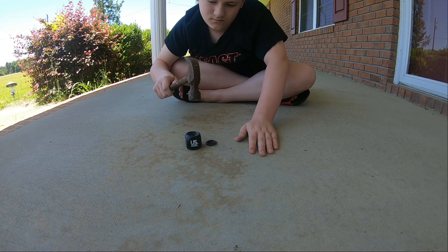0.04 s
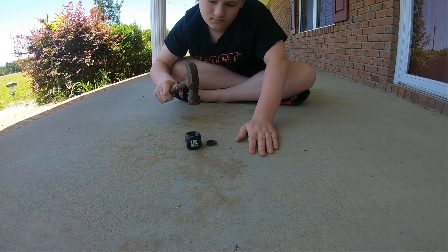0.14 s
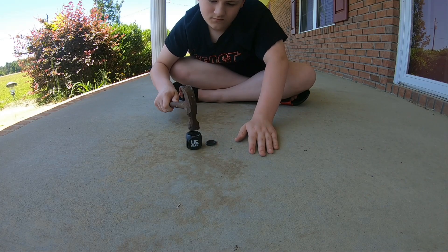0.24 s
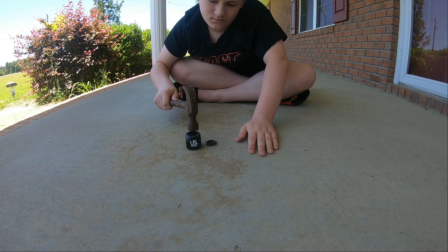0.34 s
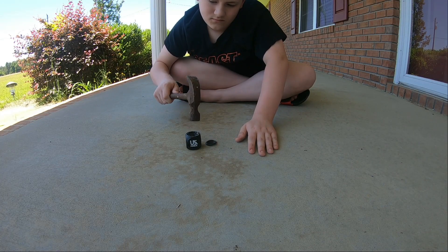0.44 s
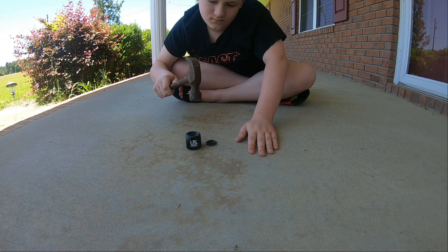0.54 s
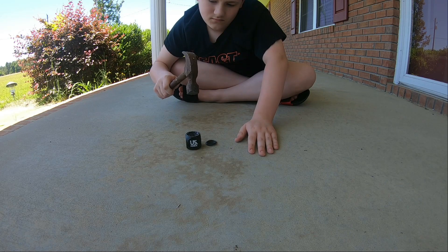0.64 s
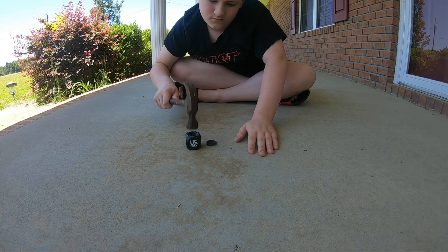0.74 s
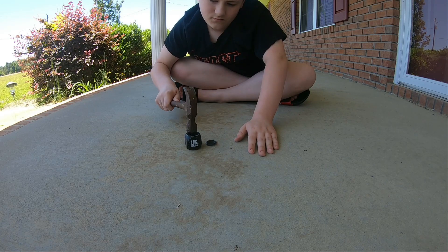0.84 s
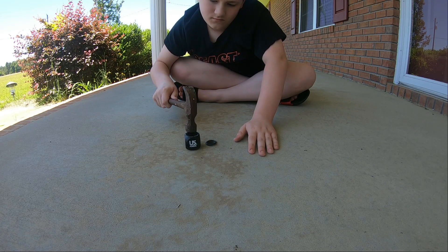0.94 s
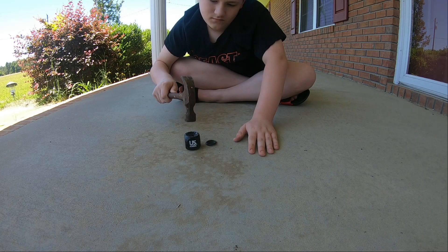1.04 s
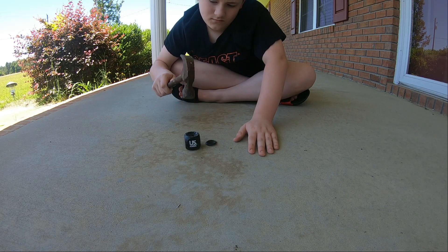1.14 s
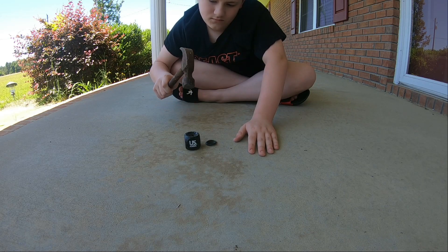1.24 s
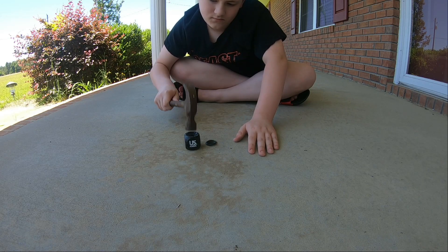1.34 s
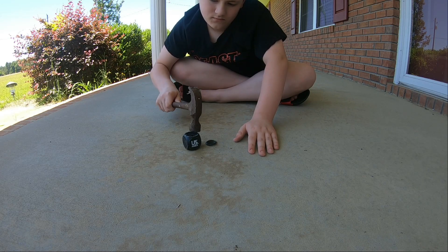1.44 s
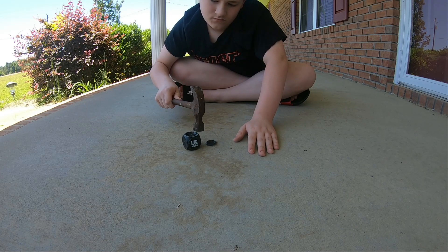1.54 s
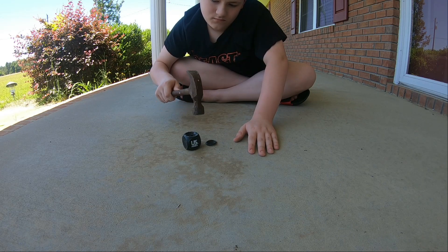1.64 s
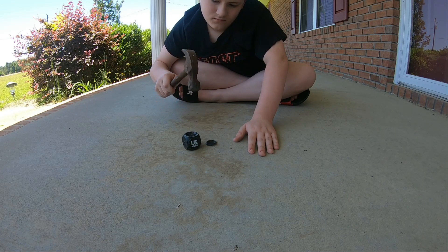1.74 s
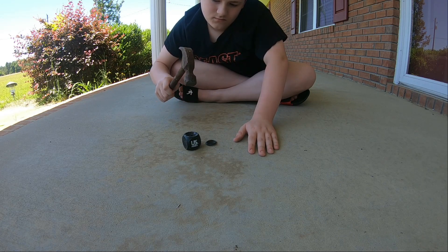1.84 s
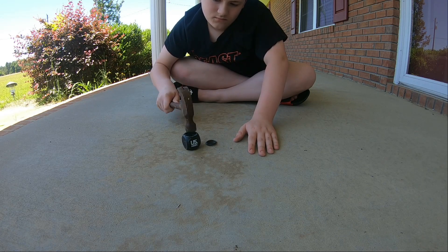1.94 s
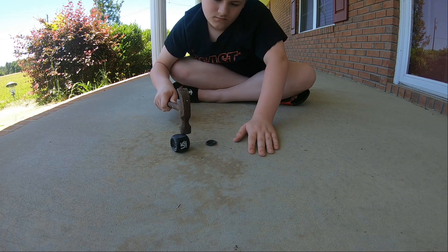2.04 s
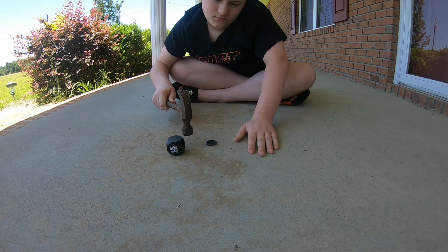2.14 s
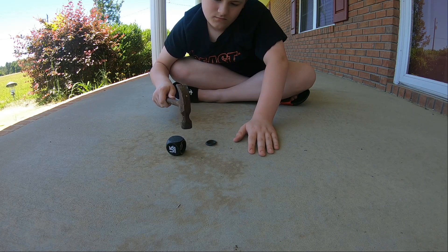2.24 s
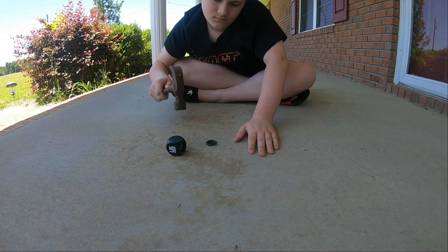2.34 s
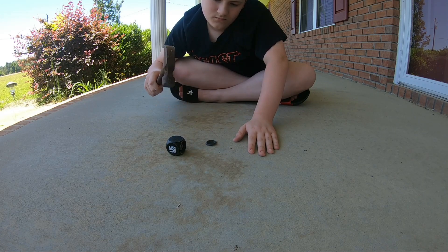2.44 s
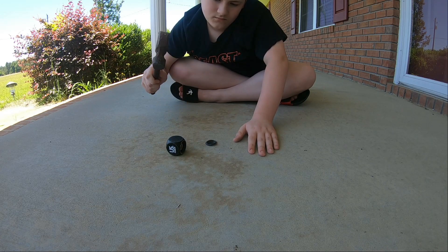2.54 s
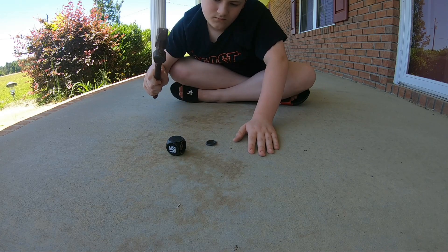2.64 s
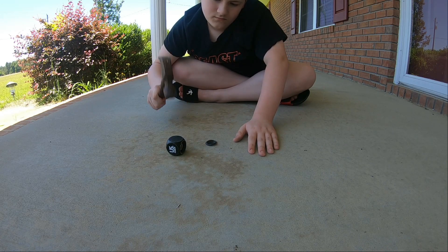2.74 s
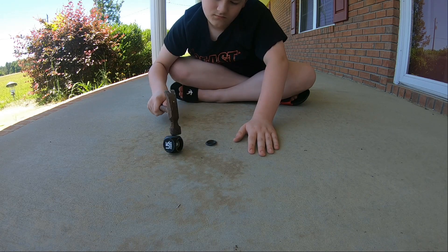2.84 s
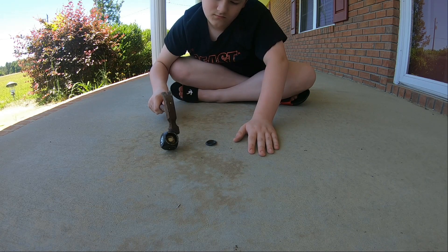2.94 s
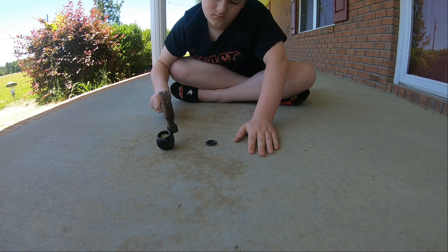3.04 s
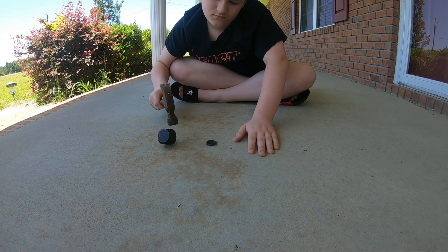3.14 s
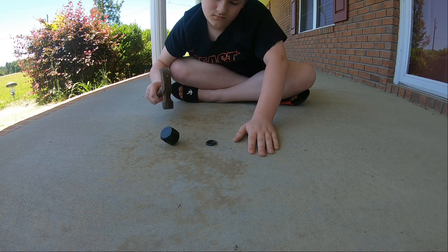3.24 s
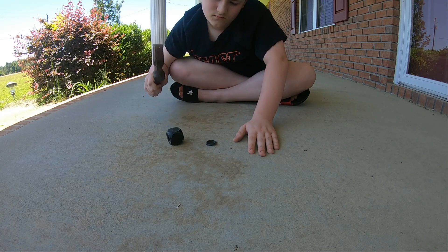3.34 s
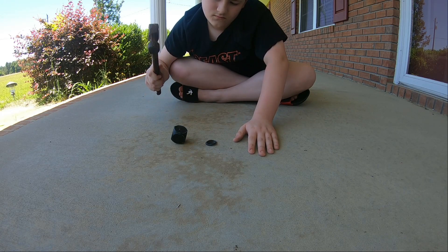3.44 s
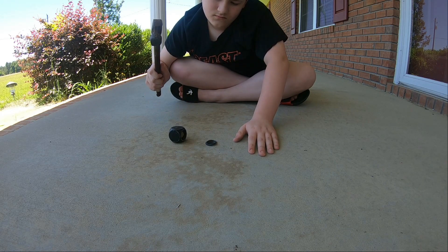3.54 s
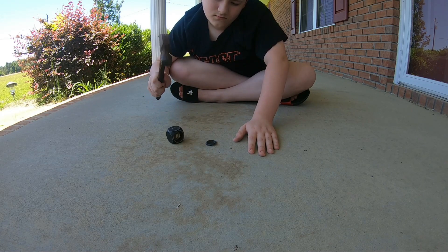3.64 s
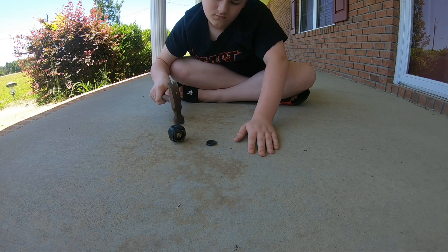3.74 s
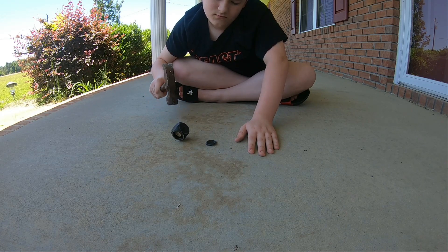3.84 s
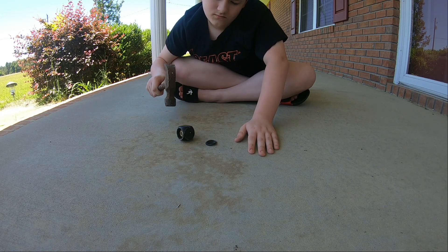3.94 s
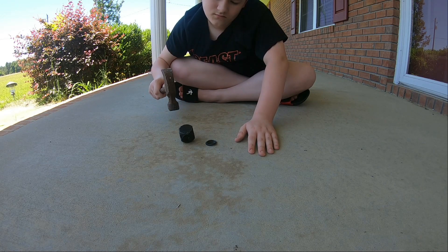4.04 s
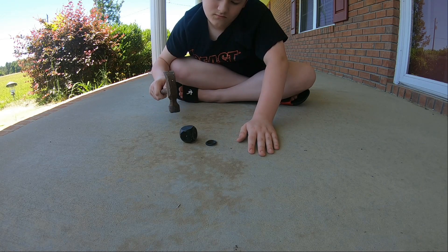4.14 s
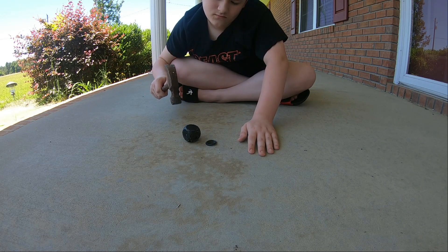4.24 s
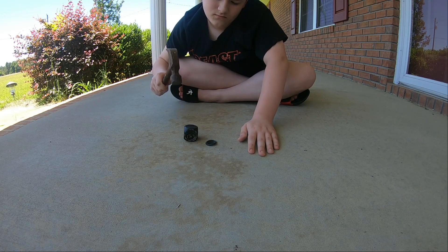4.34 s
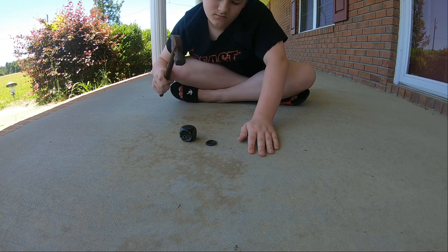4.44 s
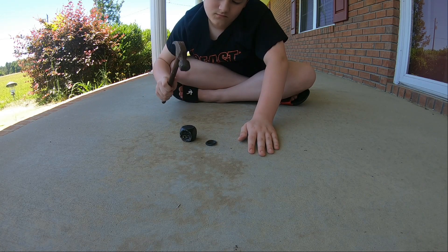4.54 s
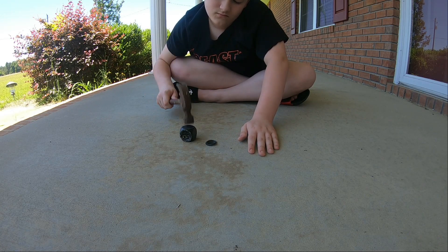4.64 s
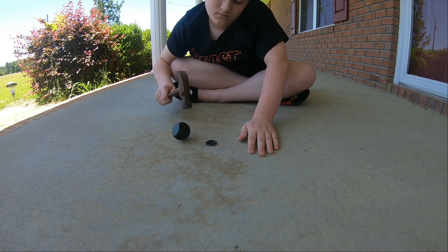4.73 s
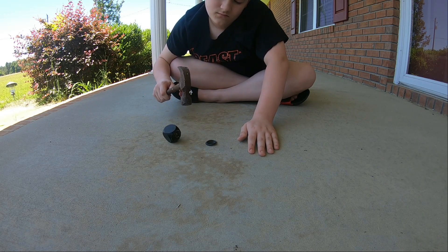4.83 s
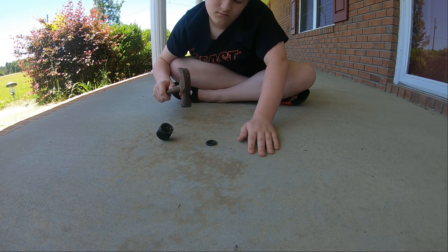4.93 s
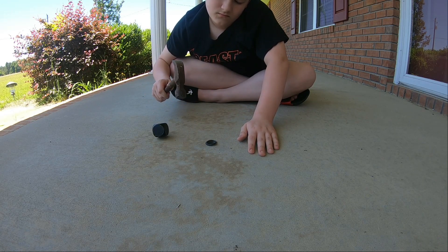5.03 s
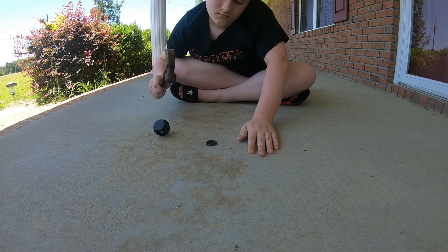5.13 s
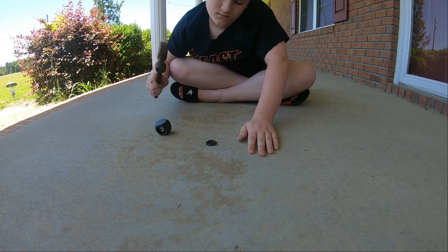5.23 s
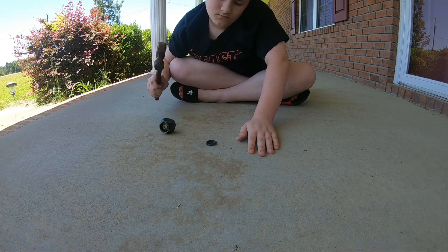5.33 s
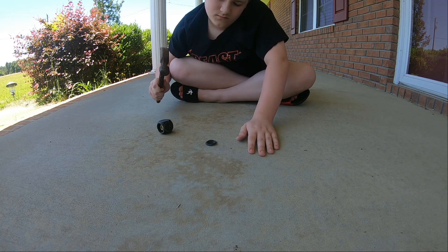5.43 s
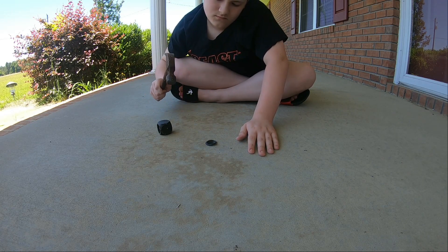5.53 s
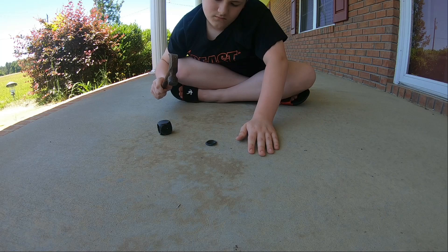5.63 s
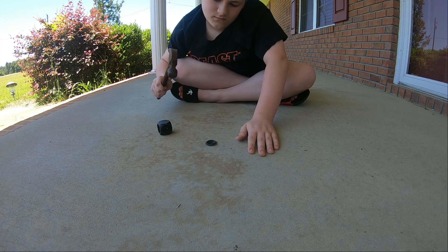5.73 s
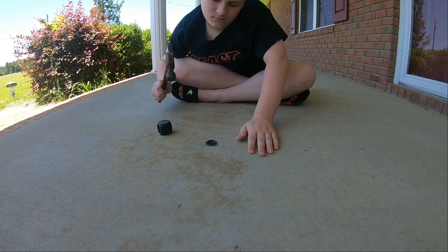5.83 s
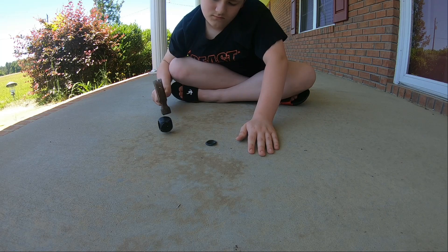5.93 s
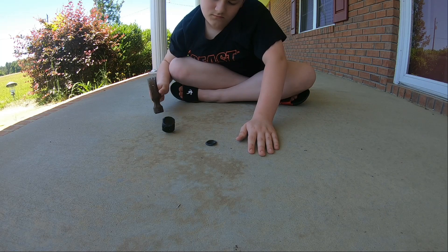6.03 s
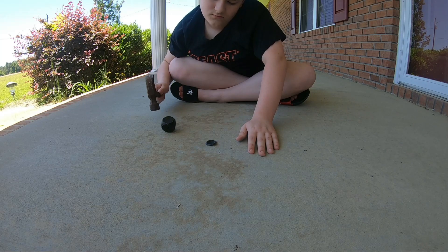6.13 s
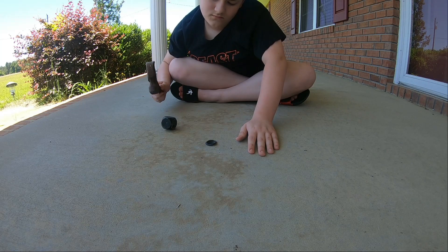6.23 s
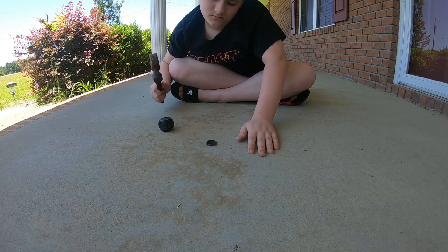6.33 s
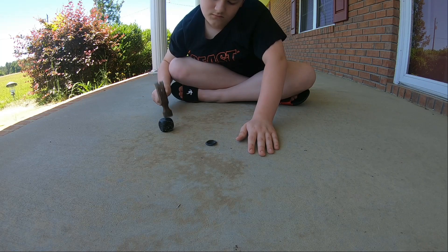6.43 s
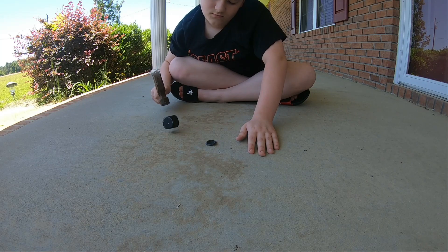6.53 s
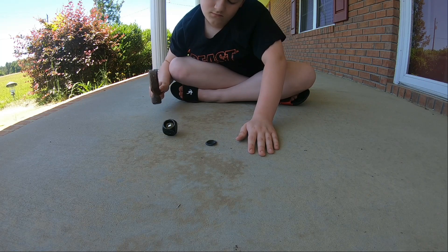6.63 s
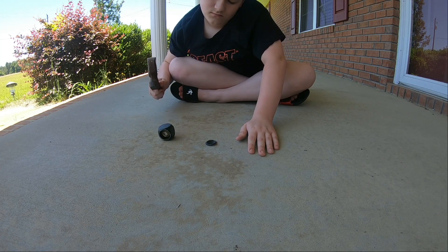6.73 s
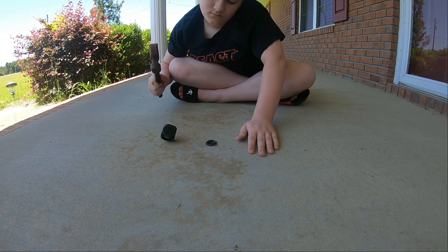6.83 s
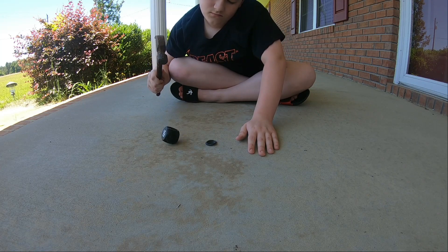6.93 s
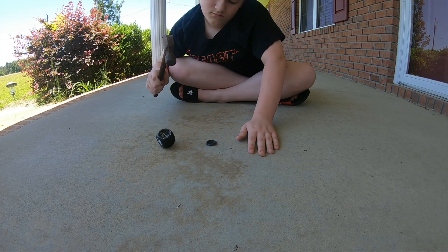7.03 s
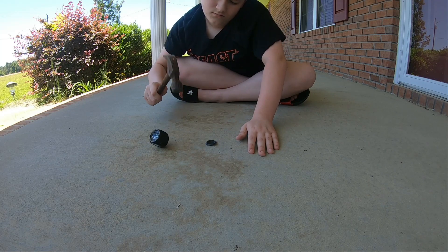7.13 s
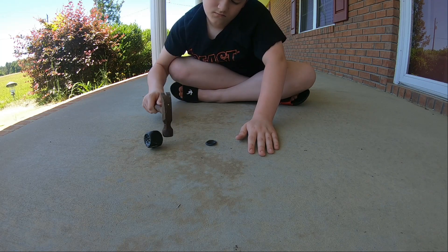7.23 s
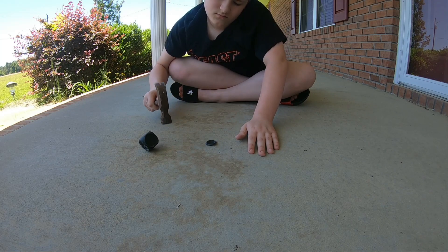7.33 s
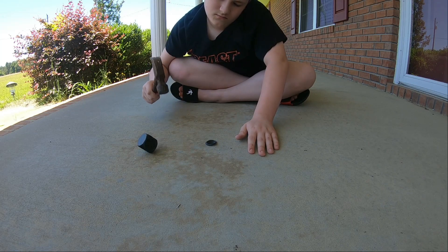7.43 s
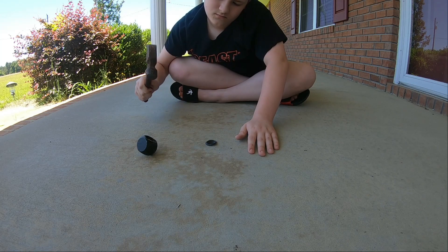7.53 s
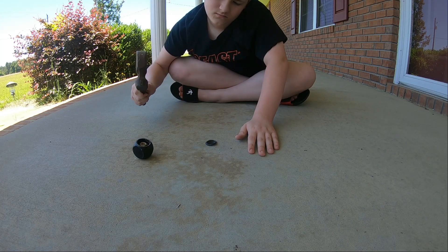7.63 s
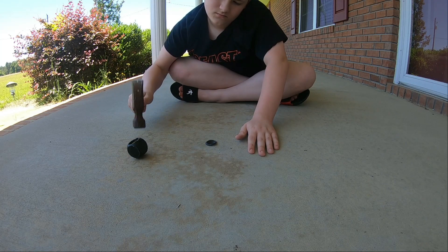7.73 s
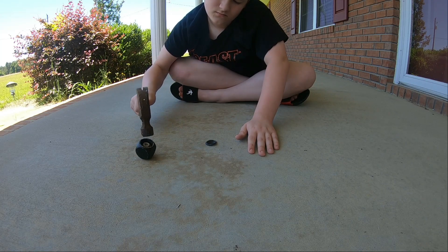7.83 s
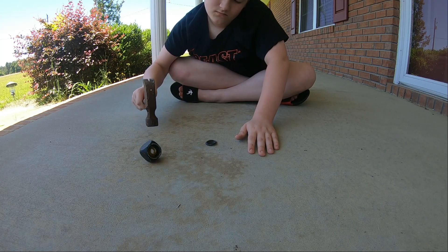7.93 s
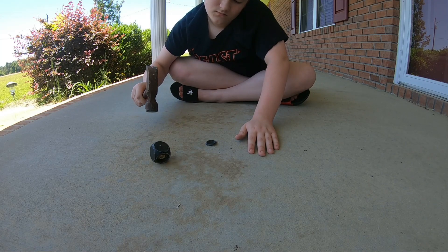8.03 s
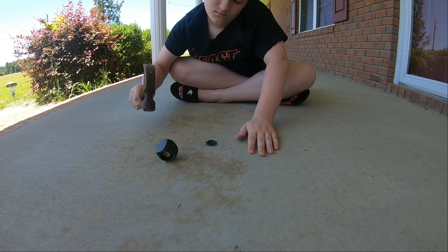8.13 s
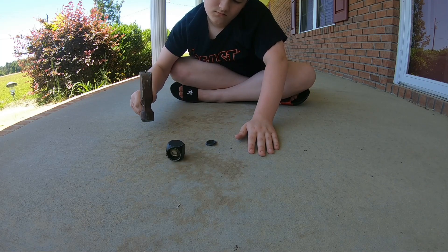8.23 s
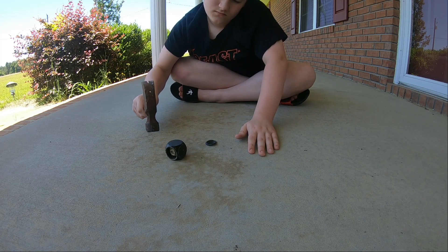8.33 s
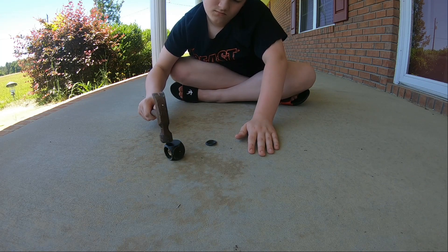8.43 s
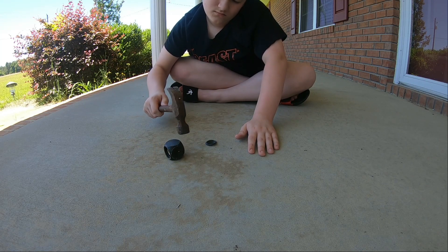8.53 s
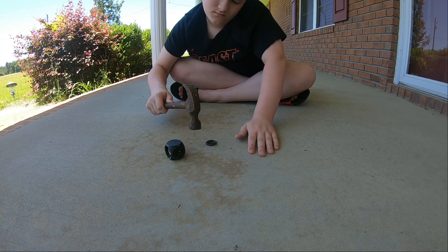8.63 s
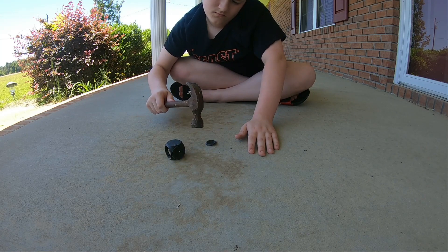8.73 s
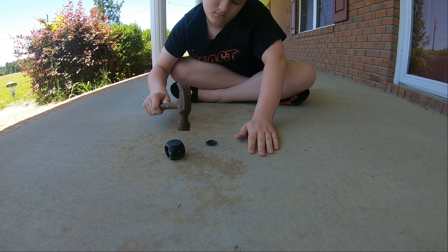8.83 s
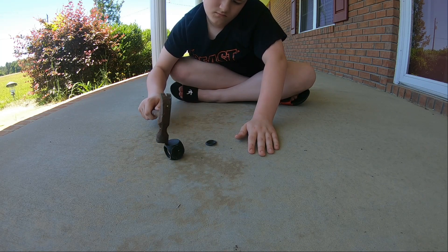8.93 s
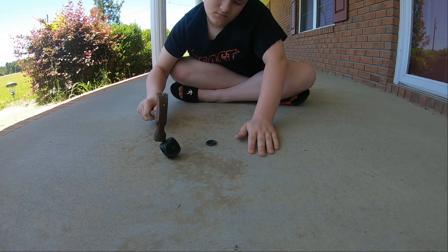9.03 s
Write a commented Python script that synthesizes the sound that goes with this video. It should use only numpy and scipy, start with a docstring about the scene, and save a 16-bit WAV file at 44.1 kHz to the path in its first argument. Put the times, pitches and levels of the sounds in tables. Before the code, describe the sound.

A claw hammer strikes a small hollow plastic object on a concrete porch about a dozen times, close to the microphone. Each blow is a sharp crack with a low thud, a faint high steel ring and a short fluttering echo. Between blows the object lands with light clicks and rolls with a soft gritty scuff. The last blows weaken, and distant traffic hums faintly throughout.

```python
"""A concrete porch, the microphone near a small plastic shell struck with a claw hammer.
Each blow cracks the shell, rings the steel head and sets slab and porch booming; echoes flutter under
the ceiling. Between blows the shell hops, lands and rolls. Far traffic hums behind, and once a thin
band of hiss rises in the distance."""
import sys
import numpy as np
from scipy import signal
from scipy.io import wavfile
from scipy.ndimage import uniform_filter1d

SR = 44100
rng = np.random.default_rng(int(sys.argv[2]) if len(sys.argv) > 2 else 0)


def dump(signal):
    """Clip the signal to [-1, 1] and save it as 16-bit WAV at the path in sys.argv[1]."""
    limited = np.clip(np.atleast_2d(signal).T, -1, 1)
    pcm = np.round(limited * 32767).astype(np.int16)
    wavfile.write(sys.argv[1], SR, pcm)


N = 399987


def gain_of(db):
    """Decibels to gain."""
    return 10 ** (np.asarray(db) / 20)


def unit_rms(x):
    """Scales to rms 1."""
    return x / np.sqrt(np.mean(x ** 2) + 1e-20)


def unit_peak(x):
    """Scales to peak 1."""
    return x / abs(x).max()


def curve_at(table, hz, column=1):
    """One column of a table, interpolated over log frequency."""
    columns = np.transpose(table)
    return np.interp(np.log(hz + 1), np.log(columns[0] + 1), columns[column])


def add(mix, start_s, sound):
    """Adds a sound to the mix at its start time."""
    part = mix[max(round(start_s * SR), 0):][:len(sound)]
    part += sound[:len(part)]


def resonate(x, hz, width_hz):
    """A resonance of gain 1 at a steady or gliding pitch."""
    carrier = np.exp(2j * np.pi * np.cumsum(hz * np.ones(len(x))) / SR)
    pole = np.exp(-np.pi * width_hz / SR)
    return 2 * (carrier * signal.lfilter([1 - pole], [1, -pole], x / carrier + 1e-18)).real


def ring(modes, length_s):
    """Struck modes: dying sines started together."""
    t = np.arange(round(length_s * SR)) / SR
    return sum(gain_of(db - 60 * t / t60) * np.sin(2 * np.pi * hz * t) for hz, db, t60 in modes)


def drifting_noise(spectrum, drift_db):
    """Coloured noise at rms 1 whose level drifts in patches of time and frequency."""
    hz = np.fft.rfftfreq(1024, 1 / SR)
    real, imag, patches = rng.standard_normal((N // 256 + 5, 513, 3)).T
    patches = unit_rms(uniform_filter1d(uniform_filter1d(patches, size=10, axis=0), size=14, axis=1))
    bins = (real + 1j * imag) * gain_of(curve_at(spectrum, hz)[:, None] + drift_db * patches)
    return unit_rms(signal.istft(bins, nperseg=1024, noverlap=768)[1][:N])


def burst(hz, width_hz, decay_ms):
    """Tiny snaps: a dying puff of noise through a steep resonance, at rms 1."""
    age = np.arange(1800) / SR * 1000 / decay_ms
    snaps = rng.standard_normal(len(age)) * (1 - np.exp(-3 * age)) * np.exp(-age)
    for _ in range(3):
        snaps = resonate(snaps, hz, width_hz)
    return unit_rms(snaps)


# Traffic, far from the porch. Each row: frequency in Hz, relative level per hertz in dB.
TRAFFIC_SPECTRUM = [(15, -49), (25, -16.5), (59, -9), (128, -1), (243, -5.5), (326, -21), (529, -33.5),
                    (790, -25.5), (1120, -39), (1500, -29), (2070, -42), (3180, -41), (6200, -59),
                    (8550, -54), (15000, -67.5)]


def traffic():
    """Distant traffic blends into a low, gently drifting hum."""
    return gain_of(-54) * drifting_noise(TRAFFIC_SPECTRUM, drift_db=2.2)


# The shell's resonances, heard close. Each row: centre in Hz, width in Hz, relative level in dB.
HOLLOW_BODY = [(1526, 1000, -1.5), (1587, 750, 0), (2354, 1230, 3.5), (2910, 800, -1.5)]
STIFF_RIM = [(3635, 2800, 2.5), (4274, 900, 2), (5210, 4900, -1)]
LOOSE_PARTS = [(8645, 490, -2.5), (9430, 900, -2.5), (10214, 810, -10)]
CRUSHED_PLASTIC = [(7380, 1500, 1), (10780, 2200, -6.5), (13900, 4200, -0.5)]


def crack(db, body_hz, rim_hz, rim_db, knock_db, fizz_db, decay_ms):
    """Snaps ring the shell's body; rim, dull knock and fizzing parts are set in dB against it."""
    def struck(bands, pitch_hz):  # bands weaken by 10 dB an octave away from the struck pitch
        return sum(gain_of(level - 10 * abs(np.log2(hz / pitch_hz))) * burst(hz, width, decay_ms)
                   for hz, width, level in bands)

    def rattle(bands, ms):
        return sum(gain_of(level) * burst(hz, width, ms) for hz, width, level in bands)

    body = struck(HOLLOW_BODY + [(body_hz, 600, 0)], body_hz)
    rim = struck(STIFF_RIM + [(rim_hz, 1300, -1)], rim_hz)
    knock = rattle([(380, 260, 0), (600, 480, 0), (1100, 900, -3)], decay_ms)
    fizz = rattle(LOOSE_PARTS, ms=11)
    fizz += gain_of(0.41 * (db + 13)) * rattle(CRUSHED_PLASTIC, ms=10)  # harder hits crunch more
    parts = [(0, body), (rim_db, rim), (knock_db, knock), (fizz_db, fizz)]
    return sum(gain_of(db + level) * unit_peak(part) for level, part in parts)


# The hammer's steel head. Each row: pitch in Hz, relative level in dB, time to fall 60 dB in seconds.
STEEL_MODES = [(6202, 4, 0.16)]
# Blows, close to the microphone. Each row: start in seconds, force as boom level in dB, crack in dB,
# body pitch in Hz, rim pitch in Hz, rim against the crack in dB, fizz in dB, steel ring gain in dB.
HAMMER_BLOWS = [(0.0004, -28.5, -24.5, 1560, 3780, -8.5, -55.5, -73),
                (0.3663, -10, -16, 1610, 4020, 0, -32, -45.5),
                (0.8957, -11.5, -15, 1600, 3650, -6, -34, -40),
                (1.495, -12, -10.5, 1610, 3360, -1.5, -31.5, -45),
                (1.5782, -15, -20, 2900, 4160, -0.5, -48, -34.5),
                (2.0883, -9, -10, 1440, 4420, -4, -27, -32.5),
                (2.9266, -9.5, -19, 2426, 4344, 11.5, -24.5, -49.5),
                (3.8821, -7.5, -9.5, 2120, 5030, -5.5, -20, -30.5),
                (4.794, -8, -15, 2036, 4800, 5.5, -32, -35.5),
                (6.0355, -7.5, -13.5, 3460, 4100, 6, -29.5, -49),
                (6.5618, -7.5, -23.5, 1950, 3890, 10, -24, -39),
                (7.885, -12.5, -13.5, 2495, 3470, -2.5, -47, -64),
                (8.57, -16.5, -18.5, 2420, 4860, -3.5, -39.5, -51),
                (9.055, -23.5, -23, 2510, 4120, -9, -60, -74)]


def hammer_blows(thud):
    """Blows crack the shell and ring the head. Returns direct sound, feed to the porch echo, boom."""
    direct, echo_feed, booms = np.zeros((3, N))
    for start, force_db, db, body_hz, rim_hz, rim_db, fizz_db, steel_db in HAMMER_BLOWS:
        knock_db = -12 + 1.5 * (force_db + 8.5)  # the knock falls with the force
        hit = crack(db, body_hz, rim_hz, rim_db, knock_db - db, fizz_db - db, decay_ms=.68)
        steel = gain_of(steel_db) * ring(STEEL_MODES, length_s=.2)
        add(direct, start, hit)
        add(direct, start, steel)
        add(echo_feed, start, gain_of(-4.5) * hit)
        add(echo_feed, start, gain_of(-13) * steel)
        add(booms, start + BOOM_LAG_S, gain_of(force_db) * thud)
    return direct, echo_feed, booms


# Low modes of the slab underfoot and the porch. Each row: pitch in Hz, relative level in dB,
# time to fall 60 dB in seconds, sign of the first swing.
SLAB_MODES = [(74, -12, .13, 1), (104, -12, .04, -1), (135, -20.6, .55, 1), (154, -13.7, .19, -1),
              (177, 0, .11, -1), (196, -6.8, .21, -1), (219, -18.4, .29, -1), (243, -.3, .06, -1),
              (283, -33, .42, 1), (319, -24, .3, -1), (348, -6.2, .04, -1), (414, -24, .11, 1),
              (48, -17, .15, 1), (77, -28, .7, 1)]
# Higher waves between slab, wall and ceiling.
# Each row: pitch in Hz, relative level in dB, time to fall 60 dB in seconds.
STANDING_WAVES = [(410, -4, .12), (558, -1, .35), (620, -1, .3), (706, 2, .18), (760, -6, .35),
                  (853, -2, .25), (935, -6, .3), (1558, -13, .3)]
BOOM_LAG_S, BOOM_RISE_S = .0008, .01


def slab_boom(length_s=.7):
    """The slab takes a hit; its low modes and the standing waves swell over milliseconds and beat."""
    t = np.arange(round(length_s * SR)) / SR
    slab = sum(sign * ring([(hz, db, t60)], length_s) for hz, db, t60, sign in SLAB_MODES)
    standing = gain_of(-25) * ring(STANDING_WAVES, length_s)
    swell = 1 - np.exp(-t / BOOM_RISE_S)
    return unit_peak(swell * (slab + standing))


# The porch around the microphone. Each row: frequency in Hz, time to fall 60 dB in seconds, gain in dB.
PORCH_DECAY = [(300, .5, -6), (1000, .5, 0), (2000, .5, 0), (3500, .5, 0), (5500, .42, 0), (9000, .3, 0),
               (14000, .26, 0)]


def porch_echo(x, ceiling_delay_s=.0125):
    """The porch returns sparse echoes of random sign, each band dying at its own speed."""
    echoes = np.zeros(SR)
    slots = np.arange(100, SR - 20, 20)
    echoes[slots + rng.integers(0, 20, len(slots))] = rng.choice([-1., 1.], len(slots))
    hz, t, bins = signal.stft(echoes, SR, nperseg=256)
    decay = gain_of(-60 * t / curve_at(PORCH_DECAY, hz)[:, None])
    tail = signal.istft(bins * decay, SR, nperseg=256)[1]
    bins = signal.stft(tail / np.linalg.norm(tail), SR, nperseg=256)[2]
    colour = gain_of(curve_at(PORCH_DECAY, hz, column=2)[:, None])
    tail = signal.istft(bins * colour, SR, nperseg=256)[1][:SR]
    wall_lift = np.where(np.arange(SR) < ceiling_delay_s * SR, gain_of(1.5), 1)  # the wall answers first
    return signal.fftconvolve(x, wall_lift * tail)[:N]


# Bands that keep bouncing under the ceiling.
# Each row: centre in Hz, width in Hz, gain in dB, time to fall 60 dB in seconds.
FLUTTER_BANDS = [(1310, 610, -11, .75), (2120, 320, -16, 1), (2820, 270, -17, .6)]


def flutter_echo(x, round_trip_s=.01447):
    """Sound bounces between slab and ceiling in evenly spaced echoes."""
    t = np.arange(SR) / SR
    echoes, tail = np.zeros((2, SR))
    echoes[np.round(np.arange(round_trip_s, 1, round_trip_s) * SR).astype(int)] = 1
    for hz, width, db, t60 in FLUTTER_BANDS:
        dying = echoes * gain_of(db - 60 * t / t60)
        tail += resonate(resonate(dying, hz, width), hz, width)
    return signal.fftconvolve(x, tail)[:N]


# Clicks near the microphone, mostly the shell landing or rocking. The two at 1.58 s are further cracks
# of a drawn-out blow, 4.086 s is a faint tick in the flutter echo, 6.4924 s a brief scrape on concrete.
# Each row: start in seconds, crack in dB, body pitch in Hz, knock and fizz in dB against the crack.
SHELL_CLICKS = [(0.0602, -45, 1630, 7, -33), (0.4502, -23.5, 1820, 0.5, -22),
                (0.9548, -27, 2950, -0.5, -21), (1.0877, -45, 1650, 0, -29), (1.5815, -14, 2800, -9, -14),
                (1.5853, -23, 2850, -4, -19.5), (2.1774, -32, 1520, 5, -32), (2.1937, -29.5, 2060, 0, -40),
                (2.234, -40.5, 1570, 5.5, -13), (2.2759, -43, 2640, 0.5, -19),
                (3.2107, -42.5, 2720, -13, -37), (3.4987, -34.5, 2720, -6, -25),
                (3.672, -35.5, 2230, -4.5, -31.5), (3.7608, -36, 2670, 0.5, -24),
                (3.9855, -24, 2330, -3, -47), (4.086, -38.5, 2180, -1, -51), (4.2997, -54, 2065, 1, -8),
                (4.433, -42, 2430, -4, -14.5), (4.5127, -39, 2550, -7, -28), (4.561, -43.5, 2600, -1, -35),
                (4.8835, -19, 3080, -5.5, -24.5), (5.1416, -36, 1730, -6.5, -54.5),
                (5.1501, -41, 1990, -6, -40), (5.4092, -46, 1964, 2, -34), (5.4247, -44.5, 1550, -3.5, -47),
                (5.5457, -53.5, 3300, 6.5, -12), (5.555, -35, 2410, -4, -45),
                (5.6378, -35.5, 2400, -4.5, -27), (5.682, -52, 1580, -33, -13),
                (6.1262, -26.5, 2540, -0.5, -41), (6.296, -40, 2120, -1, -23),
                (6.4329, -27, 2440, -11, -67), (6.4924, -41, 2580, -19.5, -22),
                (6.6839, -18.5, 2300, -12.5, -22), (6.8604, -46, 2610, 1.5, -24),
                (7.0836, -50.5, 2000, -5, -41.5), (7.1275, -47.5, 1790, 0, -28),
                (7.7525, -54.5, 1740, 8, -44.5), (7.7862, -44, 2270, -0.5, -50),
                (7.8196, -41, 2540, -12.5, -33), (8.1168, -51.5, 2420, 9, -29),
                (8.1385, -40, 2510, -1.5, -25), (8.3424, -25.5, 2530, -27, -35.5),
                (8.3491, -32, 2430, -6, -30), (8.4594, -34, 2740, -7, -23), (8.523, -39, 2680, -2.5, -22)]


def shell_clicks(thud, chatter_within_s=.03):
    """The shell clicks and chatters twice more. Returns direct sound, feed to the porch echo, boom."""
    direct, echo_feed, booms = np.zeros((3, N))
    chatters = rng.random((len(SHELL_CLICKS), 2, 2))
    for (start, db, body_hz, knock_db, fizz_db), chatter in zip(SHELL_CLICKS, chatters):
        hit = crack(db, body_hz, rim_hz=3600, rim_db=-10, knock_db=knock_db, fizz_db=fizz_db,
                    decay_ms=2.57)
        add(direct, start, hit)
        for lateness, softness in chatter:
            add(direct, start + chatter_within_s * lateness, gain_of(-8 - 2 * softness) * hit)
        add(echo_feed, start, gain_of(-11) * hit)
        boom_db = db + knock_db + .5  # a light knock barely stirs the slab
        add(booms, start + BOOM_LAG_S, gain_of(boom_db) * thud)
    return direct, echo_feed, booms


# A thin hiss, far off. Each row: time in seconds, centre in Hz, level in dB.
HISS_GLIDE = [(2.3, 2520, -92), (2.45, 2720, -83), (2.7, 3200, -88), (2.899, 3410, -79.5)]


def rising_hiss():
    """A faint band of noise glides upward through one narrow resonance."""
    times, hz, db = np.transpose(HISS_GLIDE)
    t = np.arange(N) / SR
    band = resonate(rng.standard_normal(N), np.interp(t, times, hz), width_hz=120)
    return gain_of(np.interp(t, times, db, left=-140, right=-140)) * unit_rms(band)


# The shell rolls on the slab nearby, one list a roll. Each row: time in seconds, level in dB.
ROLL_LEVELS = [
    [(3.35, -75.5), (3.552, -71.5), (3.678, -60), (3.82, -72)],
    [(4.3, -61.5), (4.422, -69), (4.562, -61.5), (4.74, -89)],
    [(5.7, -74), (5.834, -74.5), (5.98, -73)],
    [(6.95, -79.5), (7.164, -76), (7.306, -63), (7.534, -69), (7.792, -74.5), (7.83, -70)],
    [(8.17, -97.5), (8.382, -52.5), (8.5, -78)],
]
# Plastic scuffing on concrete. Each row: frequency in Hz, relative level per hertz in dB.
GRIT_SPECTRUM = [(180, -40.5), (300, 0.5), (457, -18), (741, -1.5), (1000, -17), (1530, -8.5), (2260, -29),
                 (3450, -18.5), (11000, -61), (14300, -87), (22000, -120)]


def shell_rolls():
    """The shell scuffs over the concrete: a gritty hiss that swells and fades with each roll."""
    level = np.zeros(N)
    for roll in ROLL_LEVELS:
        times, db = np.transpose(roll)
        t = np.arange(times[0], times[-1], 1 / SR)
        add(level, times[0], gain_of(np.interp(t, times, db)) * signal.windows.tukey(len(t), .2))
    grain_db = unit_rms(uniform_filter1d(rng.standard_normal(N), size=300))
    return level * unit_rms(gain_of(grain_db) * drifting_noise(GRIT_SPECTRUM, drift_db=4.5))


def scene():
    """Blows, clicks and rolls on the porch over the distant traffic and hiss, in mono."""
    onset_delay_s = .002  # all hits start this long after their listed times
    thud = slab_boom()
    direct, echo_feed, booms = np.add(hammer_blows(thud), shell_clicks(thud))
    hits = direct + flutter_echo(direct) + porch_echo(echo_feed) + booms
    hits = np.pad(hits, (round(onset_delay_s * SR), 0))[:N]
    return (hits + traffic() + shell_rolls() + rising_hiss())[None]


# The microphone on the porch. Each row: frequency in Hz, gain in dB.
MICROPHONE_RESPONSE = [(20, -7.5), (60, 0.5), (10000, 4.5), (12000, -3.5), (16000, -18.5)]


def record(dry):
    """The microphone dulls the very top, the hardest cracks overload softly, then the band is limited."""
    overload_ceiling, band_edge_hz = 1.5, 15750
    hz = np.linspace(0, SR / 2, 513)
    microphone = signal.firwin2(1023, hz, gain_of(curve_at(MICROPHONE_RESPONSE, hz)), fs=SR)
    heard = signal.oaconvolve(dry, microphone[None], "same")
    rounded = overload_ceiling * np.tanh(heard / overload_ceiling)
    lowpass = signal.firwin(511, band_edge_hz, window=("kaiser", 9), fs=SR)
    return signal.oaconvolve(rounded, lowpass[None], "same")


dry = scene()
out = record(dry)
dump(out)
```